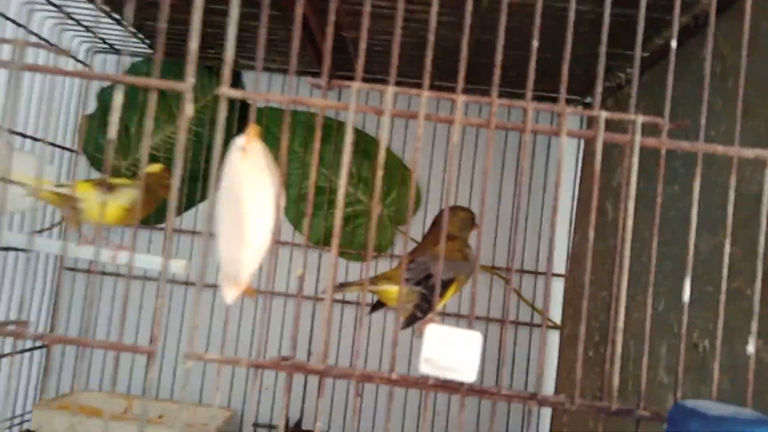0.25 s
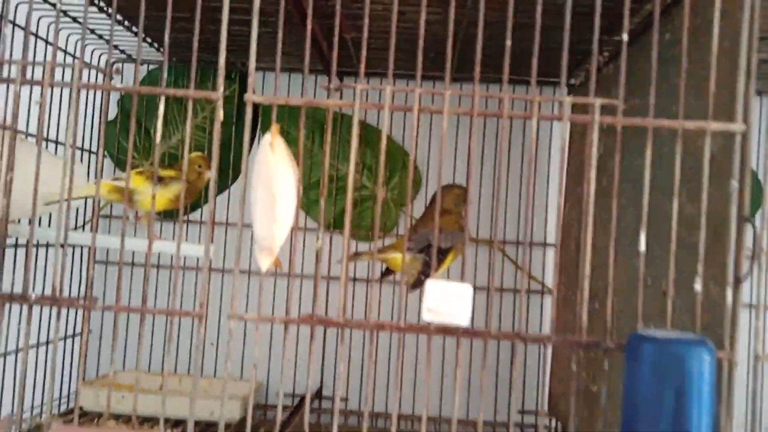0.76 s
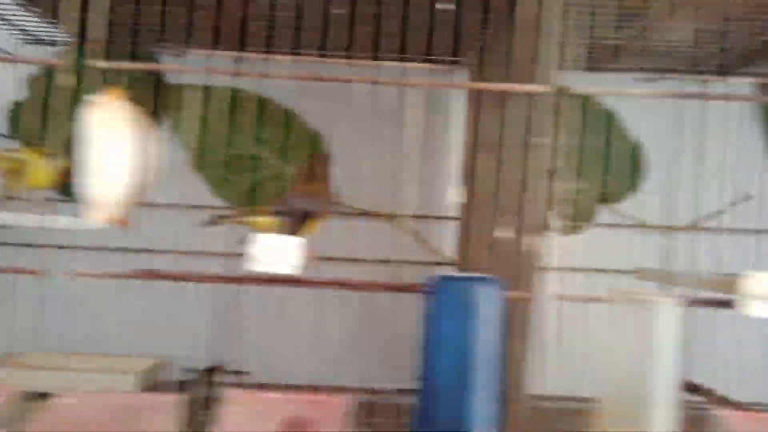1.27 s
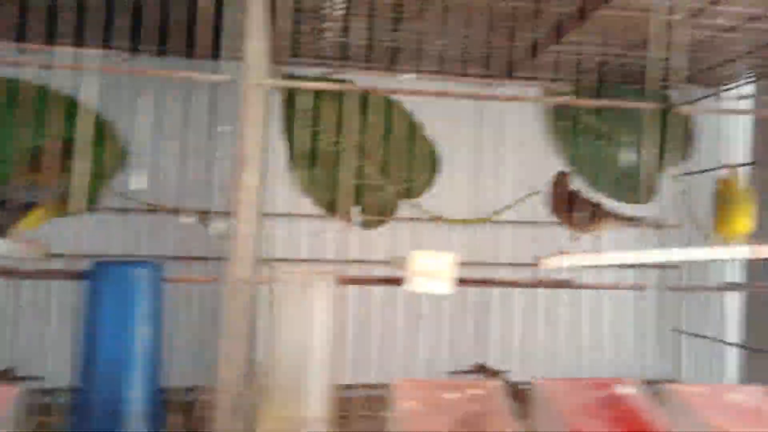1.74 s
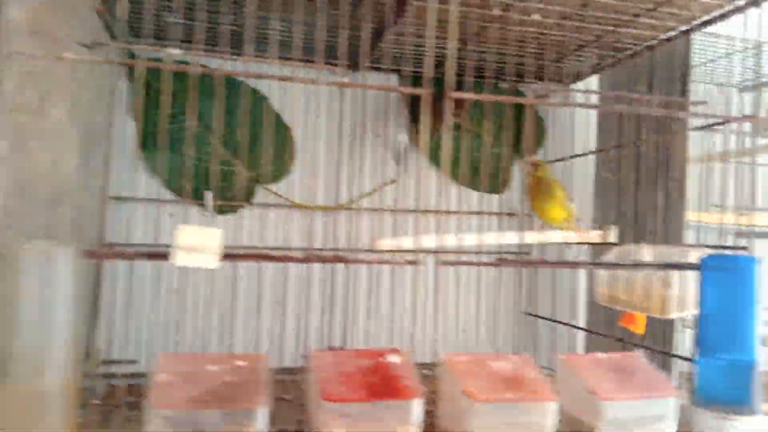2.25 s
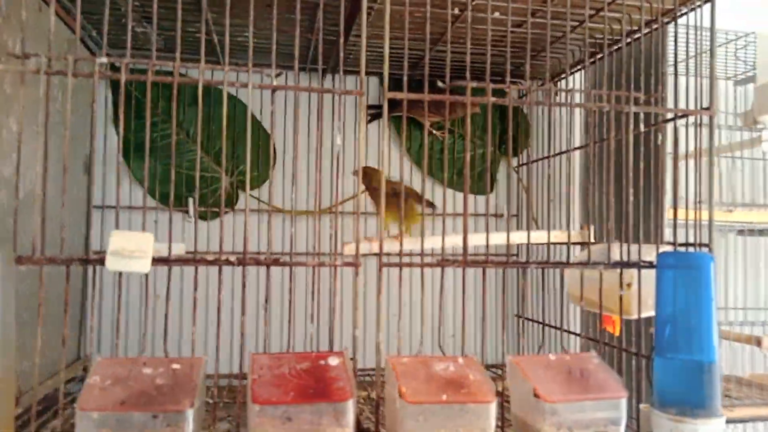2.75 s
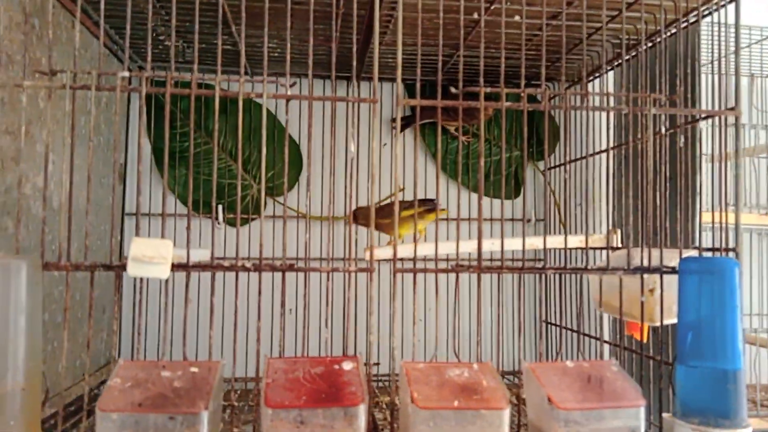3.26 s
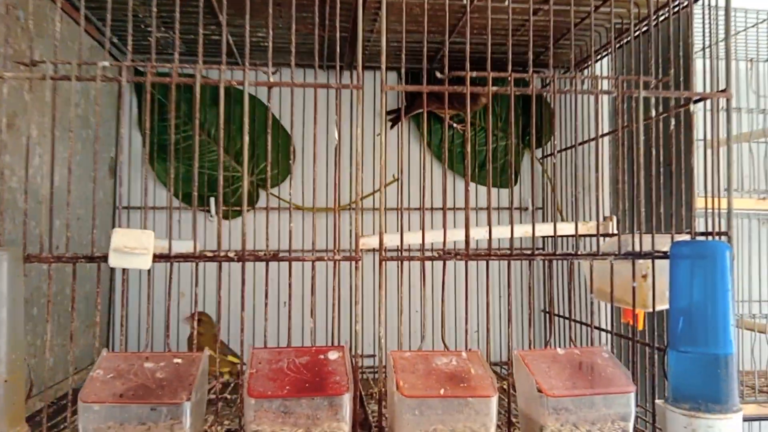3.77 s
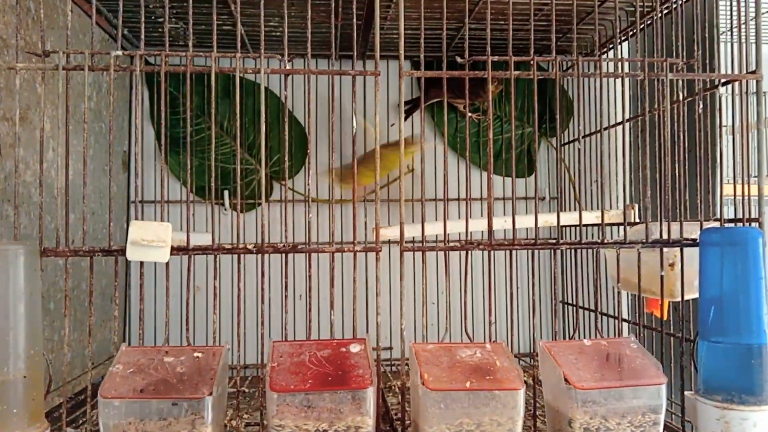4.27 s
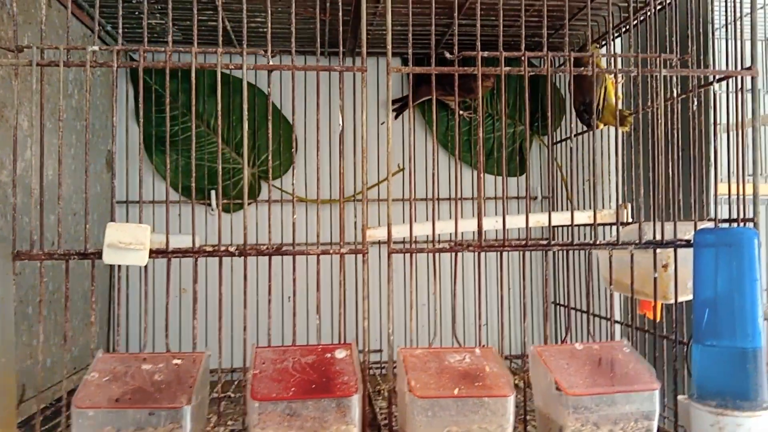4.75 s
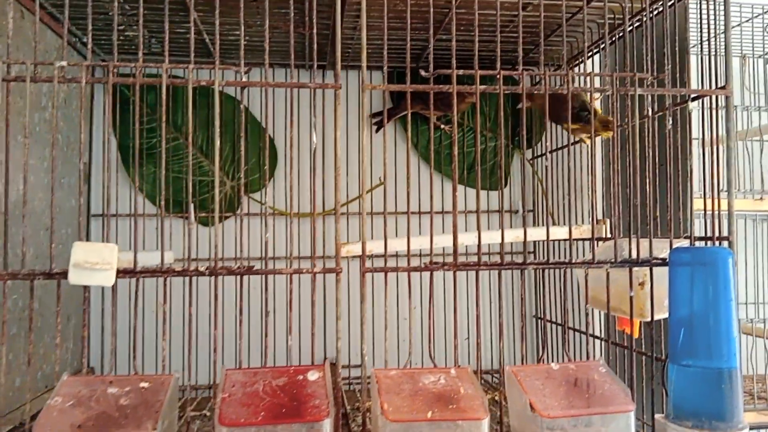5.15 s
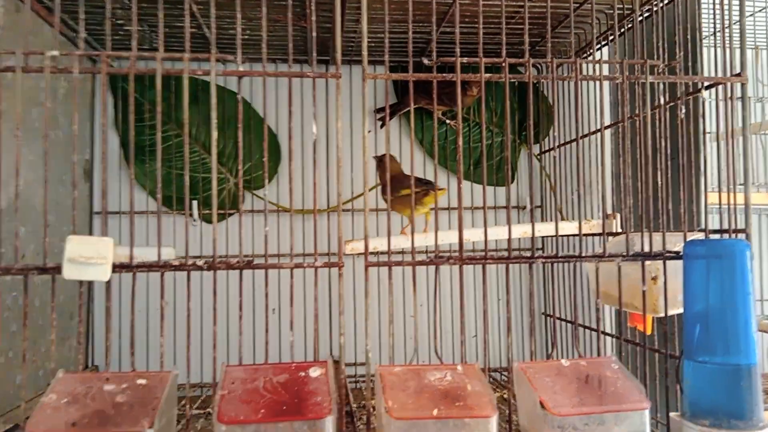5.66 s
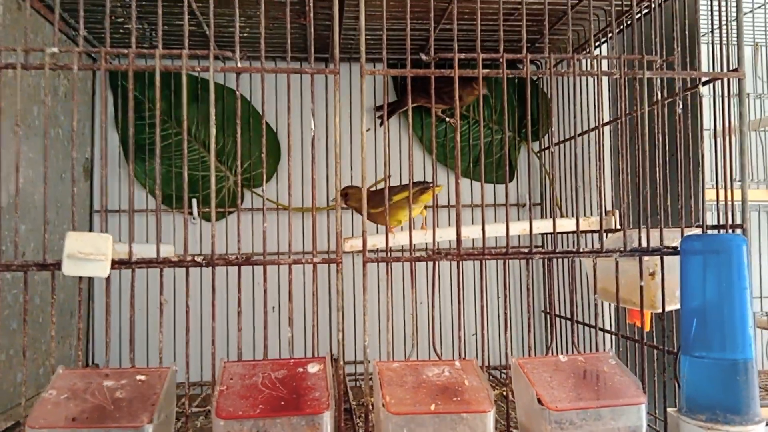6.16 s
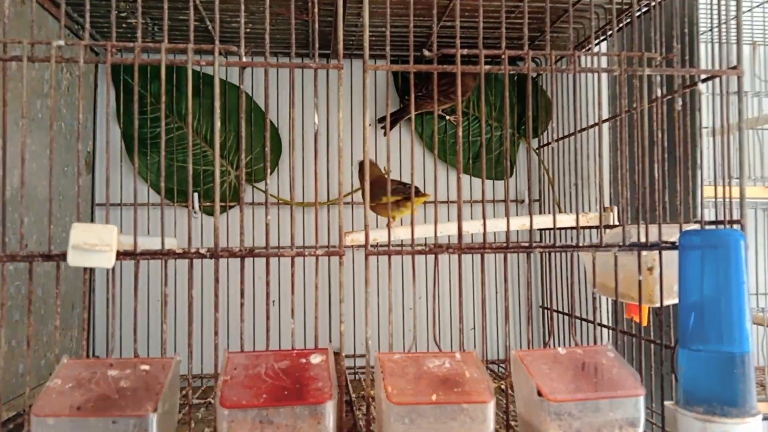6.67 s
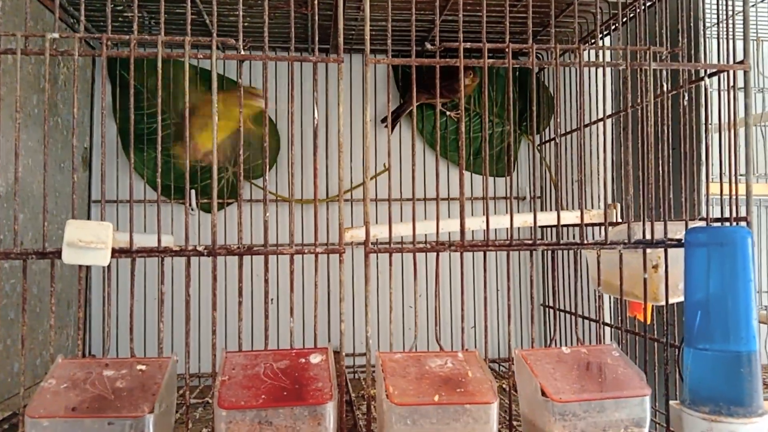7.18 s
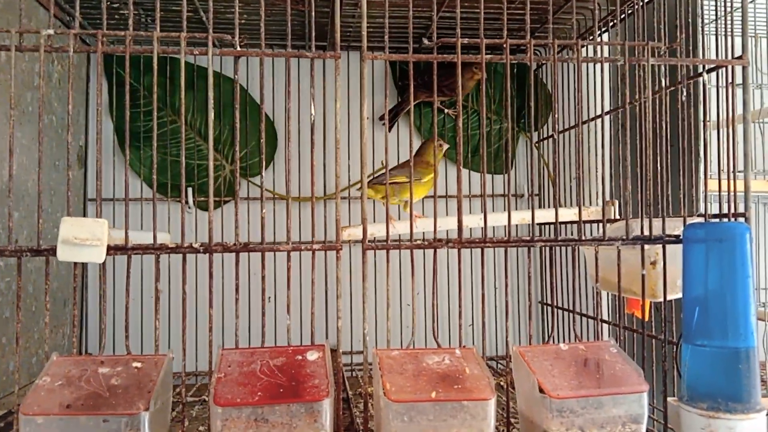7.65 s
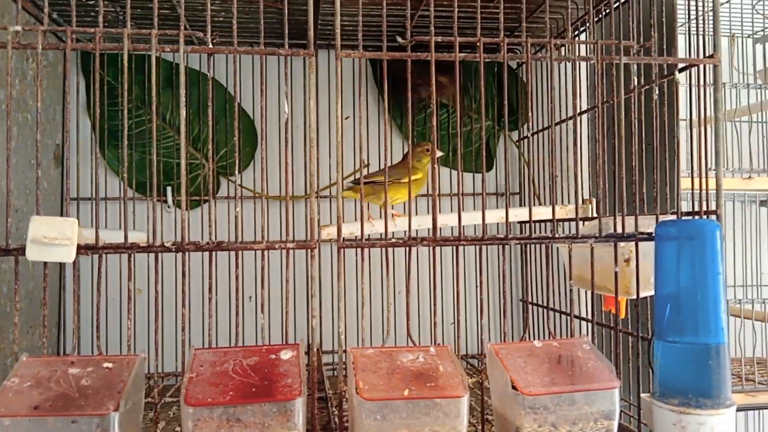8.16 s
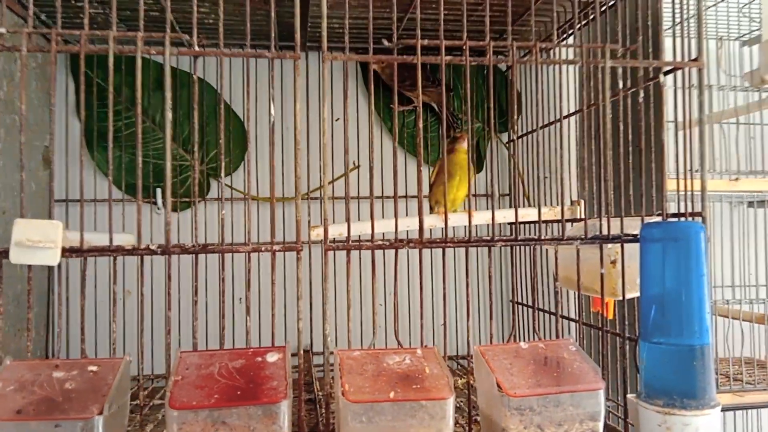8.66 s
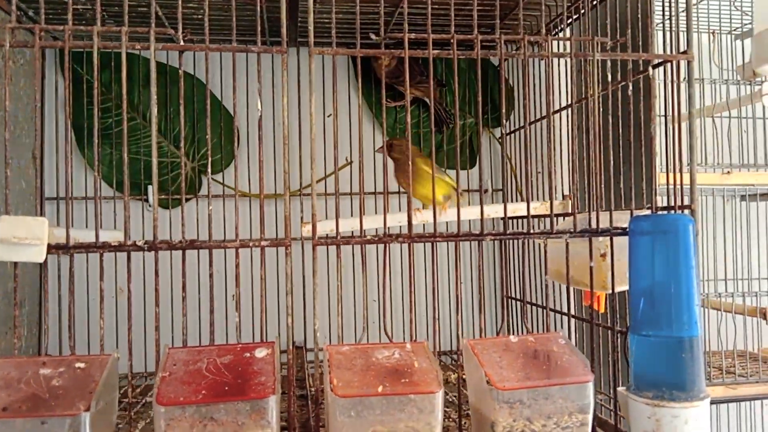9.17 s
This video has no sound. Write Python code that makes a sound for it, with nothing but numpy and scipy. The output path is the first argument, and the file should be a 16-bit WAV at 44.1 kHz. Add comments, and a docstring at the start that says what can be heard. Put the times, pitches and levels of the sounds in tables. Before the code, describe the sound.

In a bare indoor aviary, finches whistle upward, chip briefly, rustle their wings and hop with clicks and knocks on perches and bars.

```python
"""In an indoor aviary, finches and canaries sit in wire breeding cages, heard by a phone close to the bars.
Nasal whistles recur, mostly rising, the first one flat and from another bird, and short chips sound
between them: stacks of harmonics on a gliding pitch. Feet tick on perches and wire and wings rustle:
short bursts and swells of filtered noise. A bare room rings after them as a fading noise tail, a low hum
of narrow noise wavers, and the phone's noise suppressor eats the steady air by subtracting its spectrum."""
import sys
import numpy as np
from scipy import signal
from scipy.io import wavfile
from scipy.ndimage import uniform_filter1d

SR = 44100
rng = np.random.default_rng(int(sys.argv[2]) if len(sys.argv) > 2 else 0)


def transcribe(signal):
    """Save signal, clipped to [-1, 1], as a 16-bit WAV file at the path in sys.argv[1]."""
    frames = np.atleast_2d(signal).T
    limited = np.clip(frames, -1, 1)
    pcm = np.round(limited * 32767).astype(np.int16)
    wavfile.write(sys.argv[1], SR, pcm)


N = 415422  # length in samples


def undb(db):
    """Turn decibels into a gain."""
    return 10 ** (np.asarray(db) / 20)


def band(x, lo_hz, hi_hz):
    """Keep the sound between two pitches, with gentle slopes outside."""
    edges = [lo_hz, min(hi_hz, .45 * SR)]
    return signal.sosfilt(signal.butter(2, edges, "bandpass", fs=SR, output="sos"), x)


def unit(x):
    """Scale to rms 1."""
    return x / np.sqrt(np.mean(x ** 2))


def noise_band(lo_hz, hi_hz, count=N):
    """Random noise between two pitches, at rms 1."""
    return unit(band(rng.standard_normal(count), lo_hz, hi_hz))


def walk(rate):
    """Random levels, one per 1 / rate seconds, joined by straight slopes; spread near 1."""
    spacing = int(SR / rate)
    steps = np.repeat(rng.standard_normal(N // spacing + 1), spacing)
    return unit(uniform_filter1d(steps, spacing)[:N])


def add(out, s, sound):
    """Mix a sound in at time s."""
    i = int(s * SR)
    out[i:i + len(sound)] += sound[:len(out) - i]


SETTLE = 1.21  # a swell dies away this many times slower than it builds


def swells(s, fade_s, db, rest_db):
    """Gain that climbs to each peak and sinks again, over a resting level."""
    late = np.arange(0, N, 64) / SR - s[:, None]  # one value per 64 samples
    down_db = 20 * np.maximum(-late, late / SETTLE) / fade_s[:, None]
    gain = undb(rest_db) + undb(db[:, None] - down_db).sum(axis=0)
    return np.repeat(gain, 64)[:N]


AIR_DB, RUMBLE_DB = -46, -67


def steady_air():
    """Still air hisses as noise of all pitches, its level drifting a little."""
    return undb(AIR_DB + walk(3.8)) * rng.standard_normal(N)


def rumble():
    """A faint, even bed of low noise."""
    return undb(RUMBLE_DB) * noise_band(50., 1500.0)


HUM_HZ, REST_HUM_DB = 212, -76
# Swells of the low hum: peak t/s, build-up per 20 dB t/s, level/dB
HUM_SWELLS = [(1.388, 1.4, -55.5), (3.17, 0.7, -53), (4.56, 0.2, -42), (5.45, 0.85, -55),
              (6.82, 0.48, -54.5), (7.3, 0.02, -49), (7.48, 0.26, -34), (8.3, 0.07, -43), (8.919, 1, -57)]


def low_hum():
    """A narrow strip of noise sounds like one low, wavering pitch."""
    hum = noise_band(HUM_HZ - 12, HUM_HZ + 12) * undb(3 * walk(10))
    return hum * swells(*np.transpose(HUM_SWELLS), REST_HUM_DB)


LOW_TONE_FADE_S = 0.15  # time to rise or fall by 20 dB
# Faint low tones that flicker through the noise suppressor: peak t/s, f/Hz, level/dB
LOW_TONES = [(1.76, 519, -47), (3.759, 396, -50), (2.32, 900, -46), (5.4, 495, -51), (6.25, 1022, -48),
             (6.311, 439, -51.5), (6.46, 943, -53), (8.15, 778, -46), (8.42, 538, -44)]


def low_tones():
    """Narrow strips of noise, each close to one pitch, swell and fade."""
    out = np.zeros(N)
    t = np.arange(-2 * LOW_TONE_FADE_S, 2 * LOW_TONE_FADE_S, 1 / SR)  # zero at the peak
    for s, hz, db in LOW_TONES:
        strip = noise_band(.97 * hz, 1.03 * hz, len(t))
        add(out, s + t[0], strip * undb(db - 20 * np.abs(t) / LOW_TONE_FADE_S))
    return out


REST_FEATHER_DB, REST_AIR_DB, REST_THUMP_DB = -57.5, -83, -74.5
# Hops and wing flutters: peak t/s, build-up per 20 dB t/s,
# feather rustle level/dB, moved air level/dB, thump level/dB
FLUTTERS = [(.5, 0.25, -54, -60, -67), (0.719, 0.1456, -45.5, -45.5, -45), (1.019, 0.28, -54, -77.5, -51),
            (1.2, 0.42, -55, -62, -68), (1.751, 0.6, -54.5, -66, -66.5), (2.3, 0.75, -58.5, -69, -68),
            (2.62, 0.7, -51, -65.5, -63.5), (3.5, 0.14, -49, -71, -53.5), (3.76, 0.27, -49, -51, -66),
            (3.92, 0.04, -73, -72, -56), (4.081, 0.11, -45.5, -51, -54), (4.22, 0.29, -47.5, -60, -60),
            (4.37, 0.1753, -39.5, -40, -42.5), (5.38, 0.36, -50.5, -67, -63.5),
            (5.72, 0.45, -50, -69.5, -68), (6.299, 0.38, -71, -62, -60.5), (6.9, 0.17, -45, -63.5, -72.5),
            (7.16, 0.26, -49, -60, -55.5), (7.31, 0.1339, -47, -48, -58.5),
            (7.469, 0.1865, -53.5, -48, -50), (8.131, 0.3344, -45.5, -57.5, -60.5),
            (8.379, 0.08, -50, -48, -64.5), (8.94, 0.47, -49.5, -57.5, -57.5)]


def flutters():
    """Feathers brush in uneven strokes among tiny clicks of husks; moved air swishes and thumps low."""
    s, fade_s, feather_db, air_db, thump_db = np.transpose(FLUTTERS)
    brush = noise_band(1100.0, 17400.0) * undb(2.0 * walk(45))

    # about 70 clicks a second, of uneven strength
    husks = (rng.random(N) < 70 / SR) * undb(7.5 + 2.77 * rng.exponential(size=N))
    husks = signal.lfilter([1], [1, -.97], husks) * rng.standard_normal(N)  # each dies away fast
    husks = band(husks, 3600.0, 18000.)
    feathers = (brush + husks) * swells(s, fade_s, feather_db, REST_FEATHER_DB)

    thump = noise_band(44.0, 142.0) * undb(2 * walk(9))
    thump = thump * swells(s, fade_s, thump_db, REST_THUMP_DB)

    # four neighbouring bands waver separately
    swish = np.zeros(N)
    for hz in (250.0, 370.0, 540.0, 800.0):
        swish += noise_band(hz, 1.556 * hz) * undb(4.54 * walk(14))
    swish = swish * swells(s, fade_s, air_db, REST_AIR_DB)
    return feathers, thump + swish


# Feet and beaks on wire and perch: t/s, crack level/dB, knock of the perch level/dB
TICKS = [(0.047, -35, -60), (0.2013, -27, -47), (0.419, -34, -59.5), (0.709, -30, -28), (0.9024, -28, -48),
         (1.338, -28.5, -39), (2.2044, -31, -33.5), (2.3068, -41, -18), (2.318, -28, -24),
         (2.362, -29, -23), (2.597, -29, -24.5), (2.6135, -22.5, -14), (2.923, -28, -60),
         (3.6924, -46, -21), (4.0613, -26, -23), (4.2364, -28, -31.5), (4.3284, -16.5, -14),
         (4.3697, -17, -18), (6.646, -36.5, -35), (7.229, -28.5, -34), (7.325, -33.5, -47),
         (7.3974, -20, -21), (7.8477, -33, -39.5), (8.0287, -38, -36), (8.0667, -40, -34.5),
         (8.149, -29.5, -27.5), (8.3433, -24.5, -20.5), (8.372, -17.5, -19.5), (8.524, -27.5, -37),
         (8.778, -34.5, -36)]


def ticks(rattle_db=-12, knock_s=0.0051, crack_s=.0015, rattle_s=.025):
    """A contact gives a sharp crack, a short rattle of the wires and a duller knock of the perch."""
    out, t = np.zeros(N), np.arange(SR // 5) / SR
    for s, crack_db, perch_db in TICKS:
        wire, wood = rng.standard_normal((2, len(t)))
        wire[0] = wood[0] = 5  # the first contact is one hard click
        crack = band(wire, 5370.0, 17000.0) * np.exp(-t / crack_s)
        rattle = undb(rattle_db) * band(wire, 4900.0, 21000.0) * np.exp(-t / rattle_s)
        knock = band(wood, 1400.0, 4680.0) + undb(-4) * band(wood, 250., 1400.)
        knock = knock * np.exp(-t / knock_s)
        add(out, s, undb(crack_db) * (crack + rattle) + undb(perch_db) * knock)
    return out


def syrinx(hz, harmonics_db, edge_s, rough):
    """A bird's voice: harmonics on a gliding pitch, soft ends; roughness shakes pitch and level fast."""
    shake = noise_band(40., 350., len(hz))
    flutter = noise_band(40., 350., len(hz))
    phase = 2 * np.pi * np.cumsum(hz * (1 + .024 * rough * shake)) / SR
    t = np.arange(len(hz)) / SR
    ends = np.clip(np.minimum(t, t[::-1]) / edge_s, 0, 1)
    rough_gain = undb(9.0 * rough * np.tanh(flutter))
    stack = sum(undb(db) * np.sin((k + 1) * phase) for k, db in enumerate(harmonics_db))
    return np.sqrt(2) * ends * rough_gain * stack


# Short notes: start t/s, length t/s, first f/Hz, last f/Hz,
# level/dB before the nasal cut, step from each harmonic to the next level/dB
CHIPS = [ (0.121, 0.032, 2450, 2670, -45.5, -5), (.522, 0.014, 2730, 3433, -40, -2.5),
         (0.805, 0.037, 3810, 2970, -48.5, -19.5), (1.023, 0.029, 3430, 3260, -51.5, -13),
         (.91, 0.053, 3380, 3100, -54, -21), (1.553, 0.046, 1220, 1430, -43, 1),
         (2.117, 0.11, 1510, 1393, -52.5, -19), (3.027, 0.03, 1540, 1363, -40.5, -16),
         (3.022, 0.06, 3444, 3346, -52, -31), (3.077, .11, 2477, 2653, -55.5, -30),
         (3.027, 0.021, 5780, 5700, -50.5, -30), (0.356, 0.23, 907, 530, -52, -53),
         (6.757, .075, 1248, 1512, -60.5, 2.5), (3.106, 0.094, 1730, 1973, -51.5, -12),
         (3.196, 0.04, 1225, 1468, -51.5, 1), (3.594, 0.021, 3850, 2670, -36, -29),
         (3.871, 0.019, 3054, 3415, -45, -1), (4.288, 0.018, 4200, 2750, -32, -47),
         (5.003, 0.045, 1218, 1448, -51, 2), (5.417, 0.017, 4127, 2750, -31, -26.5),
         (5.652, 0.028, 3100, 4450, -31, -3), (5.694, 0.011, 4500, 3620, -39, -4),
         (5.732, 0.033, 790, 1000, -43, 0.5), (5.946, 0.023, 2600, 2560, -53.5, -29),
         (6.043, 0.043, 2744, 2680, -45, -13), (6.448, .028, 3690, 2560, -53.5, -30),
         (3.242, 0.051, 1950, 2520, -47.5, -1), (6.949, 0.015, 3500, 3020, -29, -37),
         (7.427, 0.017, 4540, 3450, -36, -13.5), (7.438, 0.024, 4100, 3070, -40, -65),
         (7.459, 0.02, 3830, 2764, -30.5, -14.5), (7.764, 0.033, 3445, 3246, -52.5, -30),
         (8.169, 0.015, 3720, 3200, -49, -36), (8.306, 0.022, 3460, 2630, -45, -55),
         (8.95, 0.051, 1176, 1512, -50.5, 1)]


def chips(rough_nasal=.5, nasal_cut_db=7):
    """Short gliding notes, rougher when overtones are strong; nasal and faint ones come from far cages."""
    near, far = np.zeros(N), np.zeros(N)
    for s, length, from_hz, to_hz, db, step_db in CHIPS:
        # the pitch moves fast at first, then settles
        hz = to_hz + (from_hz - to_hz) * np.linspace(1, 0, int(length * SR)) ** 1.5
        count = int(9000 / max(from_hz, to_hz))  # harmonics up to 9 kHz
        stack_db = db + step_db * np.arange(count)
        stack_db[0] -= nasal_cut_db * (step_db > 0)  # rising overtones: weak fundamental
        note = syrinx(hz, stack_db, 0.0029, rough_nasal * undb(min(step_db, 0)))
        is_far = step_db > -10 or db < -46
        add(far if is_far else near, s, note)
    return near, far


# Fourth and fifth harmonic, against the second lowered by the size of the third's step: level/dB
WHISTLE_HIGH_DB = [-3.5, -9]
# Change of the harmonics per octave below the held pitch
FIRST_DB_PER_OCT, SECOND_DB_PER_OCT = -10, 3.0
# The last stretch of a whistle, and the change reached at its end
RELEASE_S, FIRST_FADE_DB, SECOND_FADE_DB = .11, -16, -27
# Hiss around the glide: level against the second harmonic at full blur, and its band
HISS_DB, HISS_LO_HZ, HISS_HI_HZ = -6.5, 3740, 6850
# Long whistles: start t/s, length t/s, swell t/s, glide t/s, slowing of the glide (exponent),
# first f/Hz, held f/Hz, fundamental level/dB, second harmonic level/dB (both at the held pitch),
# third against second harmonic level/dB
WHISTLES = [(0.16, 0.24, 0.0055, .2, 1.08, 3314, 3166, -39, -56, 13),
            (1.582, 0.35, 0.013, 0.16, 2.1, 1900, 2985, -37.5, -33.5, -13),
            (3.296, 0.23, 0.0017, 0.16, 3.16, 2550, 3063, -37.5, -34, -13.5),
            (5.043, .37, 0.0032, 0.125, 1.7, 1820, 3009, -36.5, -36, -16),
            (6.825, .27, 0.0091, .2, 1.7, 1794, 3051, -37, -36.5, -11),
            (8.988, 0.37, 0.044, 0.23, 2.61, 1871, 3057, -38, -34, -16.5)]


def whistles(waver=.004, blur_per_glide=.2):
    """A whistle sounds blurred and hissy while its pitch glides, and clears on the held pitch."""
    out = np.zeros(N)
    tremble = 1 + waver * walk(120)
    puff_db = 5 * walk(300)  # the hiss comes in quick uneven puffs
    for s, length, swell, glide_s, slowing, from_hz, held_hz, first_db, second_db, third_db in WHISTLES:
        i = np.arange(int(s * SR), min(int((s + length) * SR), N))
        t = i / SR - s
        hz = held_hz + (from_hz - held_hz) * np.clip(1 - t / glide_s, 0, 1) ** slowing

        octaves_under = np.log2(held_hz / hz)
        fade = np.clip(1 - (length - t) / RELEASE_S, 0, 1)
        first_db = first_db + FIRST_DB_PER_OCT * octaves_under + FIRST_FADE_DB * fade
        second_db = second_db + SECOND_DB_PER_OCT * octaves_under + SECOND_FADE_DB * fade
        lowered_db = second_db - abs(third_db)
        stack_db = [first_db, second_db, second_db + third_db]
        stack_db += [lowered_db + db for db in WHISTLE_HIGH_DB]

        # faster glides get a rougher, blurred edge
        glide = uniform_filter1d(np.abs(np.gradient(np.log(hz))) * SR, size=SR // 50)
        blur = np.minimum(blur_per_glide * glide, 1)
        hiss = noise_band(HISS_LO_HZ, HISS_HI_HZ, len(t)) * np.sqrt(np.abs(blur))
        hiss = hiss * undb(second_db + HISS_DB + puff_db[i])
        tone = syrinx(hz * tremble[i], stack_db, 0.0023, blur)
        add(out, s, (tone + hiss) * np.minimum(t / swell, 1) ** 2)
    return out


ROOM_T60_S, ROOM_GAP_S = 0.35, 0.003  # time to fade by 60 dB, silence before the tail
NEAR_ROOM_DB, FAR_ROOM_DB = -7, -1  # how much near and far sounds feed the room


def room(x):
    """Bare walls answer with a dense, quickly dying tail of reflections."""
    t = np.arange(int(ROOM_T60_S * SR)) / SR
    tail = rng.standard_normal(len(t)) * np.exp(-np.log(1000) * t / ROOM_T60_S) * (t > ROOM_GAP_S)
    tail = band(tail, 150., 9600.0)
    return signal.fftconvolve(x, tail / np.linalg.norm(tail))[:N]


def scene():
    """Birds and cages ring in the room; air, rumble, hum and other low sounds lie under them."""
    feathers, moved_air = flutters()
    near_chips, far_chips = chips()
    near = near_chips + ticks() + feathers
    far = far_chips + whistles()
    walls = room(undb(NEAR_ROOM_DB) * near + undb(FAR_ROOM_DB) * far)
    background = steady_air() + rumble() + low_hum() + low_tones() + moved_air
    return (near + far + walls + background)[None]


SUPPRESS, LEAK_DB = 1.2, -15  # times the steady power removed, lowest gain
TOP_HZ = 15900
# Colour of the phone's microphone: f/Hz, level/dB
MIC = [(30, -40.5), (50, -8), (130, -7), (700, -14), (1050, -18), (2200, -10), (2900, -2.5), (3900, -0.5),
       (5000, -4), (6000, 4.5), (7500, -2.5), (8600, -19.5), (10000, -12.5), (12800, -22), (15200, -2.5)]


def record(dry):
    """The microphone colours the sound; a suppressor subtracts the steady spectrum; the top is cut."""
    f, _, z = signal.stft(dry, SR, nperseg=1024, noverlap=768)
    hz, db = np.transpose(MIC)
    z = z * undb(np.interp(np.log(f + 1), np.log(hz), db))[:, None]

    power = uniform_filter1d(np.abs(z) ** 2, size=3, axis=-1)
    # its bands are narrow in the bass, where lone tones flicker through, and wide in the treble
    power = np.where(f[:, None] > 1800, uniform_filter1d(power, size=25, axis=1), power)
    steady = np.percentile(power, 30, axis=-1, keepdims=True)
    kept = 1 - SUPPRESS * steady / (power + 1e-18)
    z = z * np.sqrt(np.maximum(kept, undb(2 * LEAK_DB)))  # doubled dB, as this is power

    out = signal.istft(z, SR, nperseg=1024, noverlap=768)[1][:, :N]
    return signal.sosfilt(signal.ellip(10, .2, 70, TOP_HZ, fs=SR, output="sos"), out)


dry = scene()
out = record(dry)
transcribe(out)
```